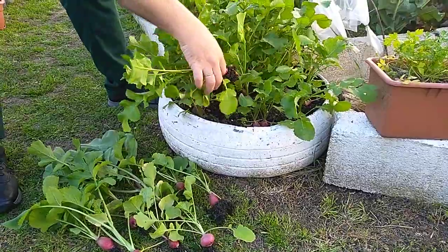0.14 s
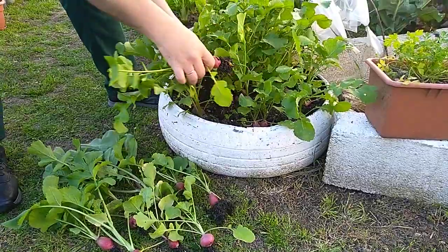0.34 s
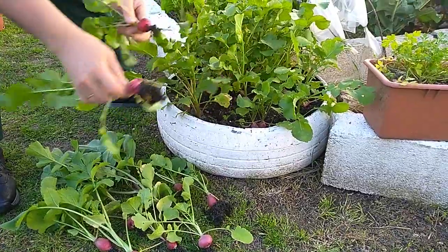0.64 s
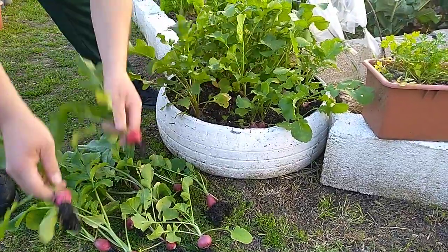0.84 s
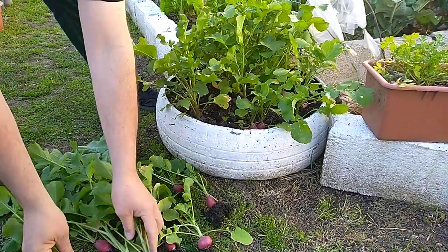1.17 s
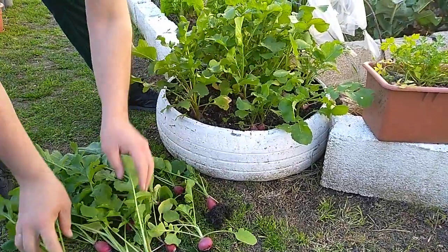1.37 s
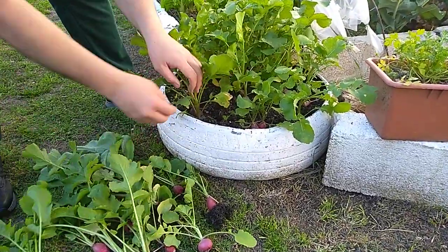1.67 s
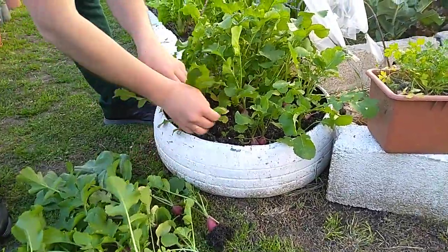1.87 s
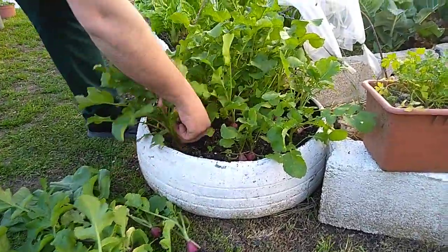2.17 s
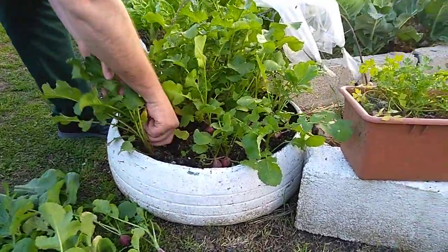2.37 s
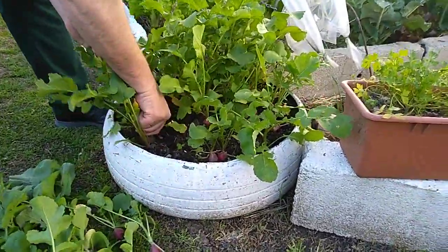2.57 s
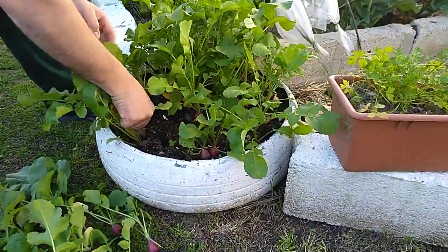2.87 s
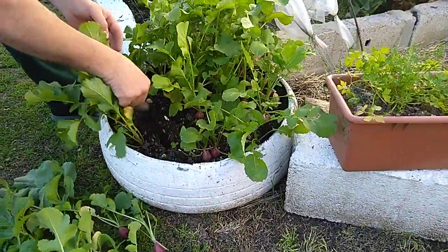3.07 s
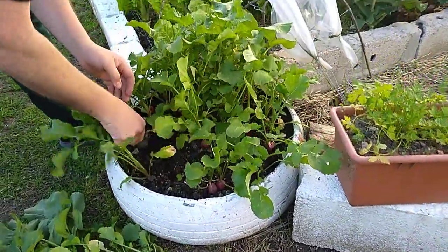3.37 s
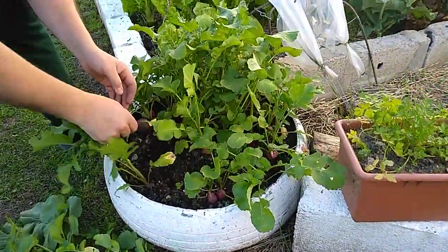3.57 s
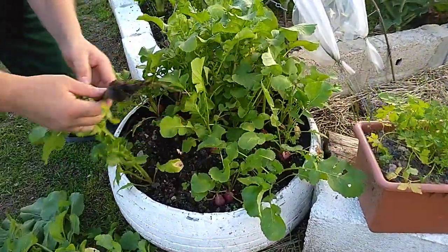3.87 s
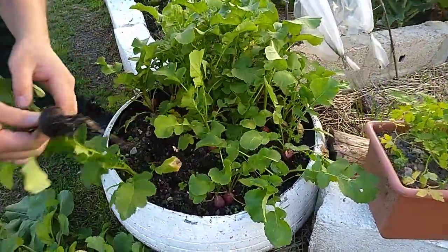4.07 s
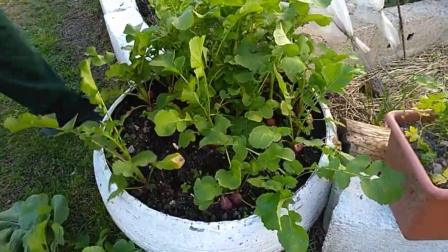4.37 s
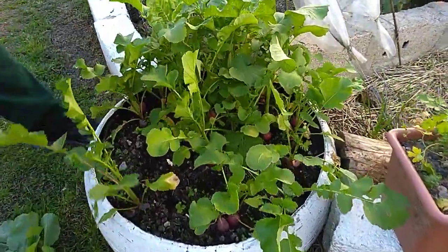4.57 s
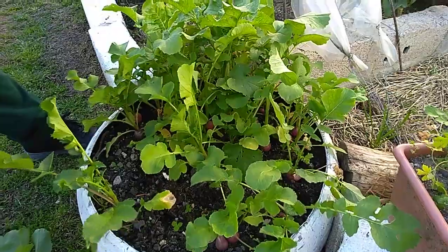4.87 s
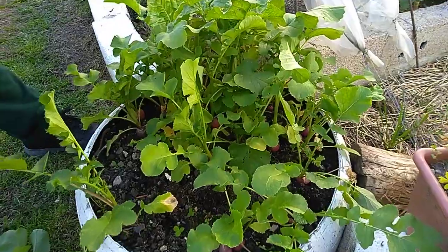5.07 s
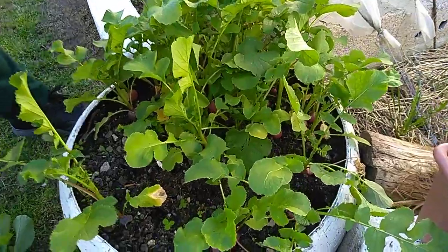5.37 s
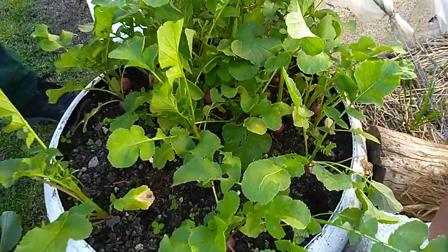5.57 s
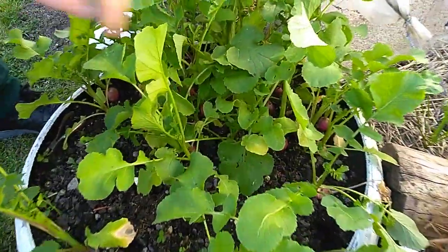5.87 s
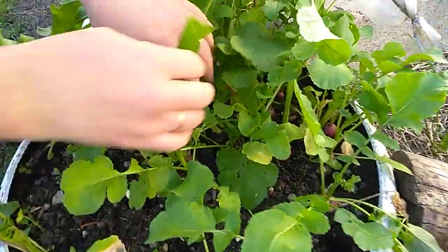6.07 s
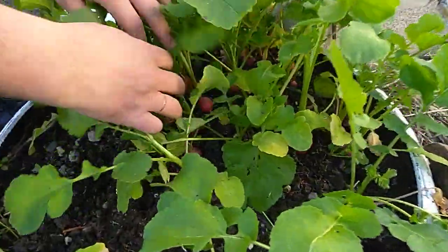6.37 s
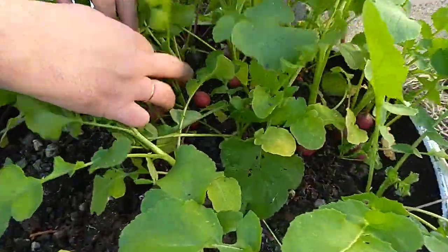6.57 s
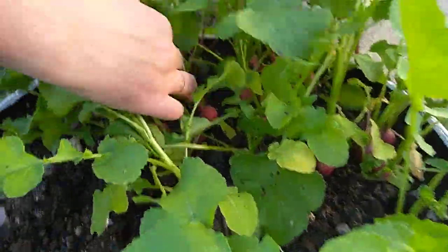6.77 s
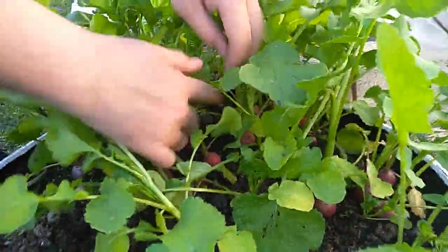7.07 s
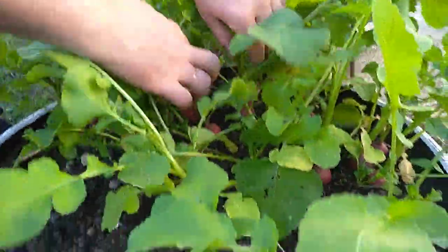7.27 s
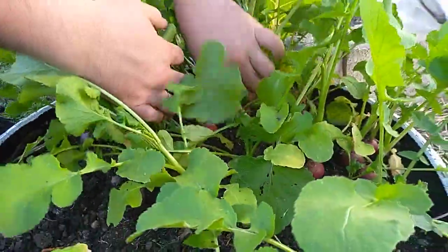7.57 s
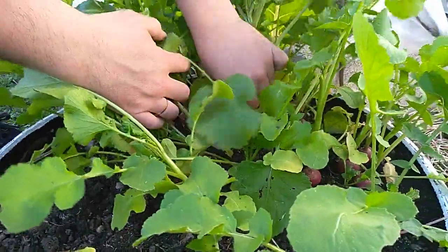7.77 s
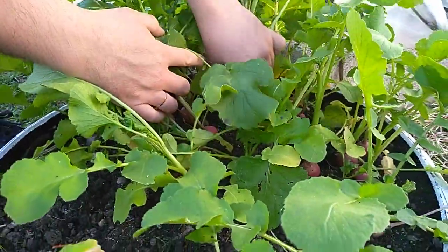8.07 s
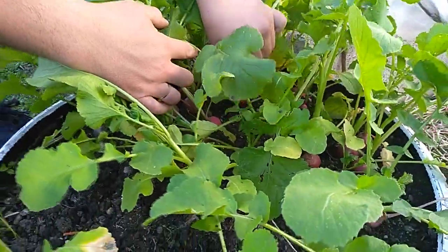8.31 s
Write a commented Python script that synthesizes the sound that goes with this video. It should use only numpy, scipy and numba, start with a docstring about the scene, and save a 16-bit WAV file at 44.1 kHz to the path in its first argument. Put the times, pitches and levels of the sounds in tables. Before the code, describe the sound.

Outdoors in a quiet garden, hands pull plants from a planter close to a hand-held stereo microphone. Soft separate leaf swishes come first, then stronger rustles around four seconds. A root tears at five and a half with a deep wind buffet, followed by continuous crackling rummaging, sharp stem snaps and low gusts, then a dull closing knock.

```python
"""Pulling radishes in a garden

Hands pull radishes from a planter and push through the leaves, close to a hand-held stereo microphone.
Leaves crackle and swish as noise gated by tiny slips; soil and bunches thud as dull, slightly hollow noise.
Stems snap as short noise cracks, knocks ring one mode each, and a tearing root is a dense run of slips.
Gusts buffet the microphone as noise in a low moving resonance, and faint far hoots are narrow gliding noise.
Behind it all lie a far rumble and hiss with a faint wavering hum."""
import sys
import numpy as np
from scipy import signal
from scipy.io import wavfile
from scipy.ndimage import uniform_filter1d
from numba import njit

SR = 44100
rng = np.random.default_rng(int(sys.argv[2]) if len(sys.argv) > 2 else 0)


def boost(x):
    """Linear amplitude factor 10**(x/20) for a level x in decibels (scalar or array-like)."""
    u = np.asarray(x, float) / 20
    return 10 ** u


def pcm_store(signal):
    """Save signal as 16-bit PCM."""
    levels = np.round(np.clip(np.atleast_2d(signal), -1, 1) * 32767)
    wavfile.write(sys.argv[1], SR, levels.astype(np.int16).T)


N = 372204


def rms_one(x):
    """Scales a sound to an average strength (rms) of 1."""
    return x / np.sqrt(np.mean(x ** 2) + 1e-20)


def mean_level_one(part):
    """Scales a stereo sound so that the mean of its two channels has strength 1."""
    return part / np.std(part.mean(axis=0))


def in_time(rows):
    """Draws straight lines between the rows of a table: one curve for each column after the time."""
    s, *columns = np.transpose(rows)
    return [np.interp(np.arange(N) / SR, s, column) for column in columns]


def at_hz(points, hz):
    """Reads a table of (frequency, value) at a frequency, on a logarithmic frequency scale."""
    points_hz, values = np.transpose(points)
    return np.interp(np.log(hz), np.log(points_hz), values)


def sides(left_over_right_db):
    """Gains of left and right that share a level difference equally."""
    return boost(np.multiply.outer([.5, -.5], left_over_right_db))


def band(x, low_hz, high_hz, order=2):
    """Keeps the frequencies between two limits."""
    limits = [low_hz, min(high_hz, SR * .45)]
    return signal.sosfilt(signal.butter(order, limits, "band", fs=SR, output="sos"), x)


def drift(rate_hz):
    """Slow random wandering with spread 1: noise at every 20th sample, smoothed twice."""
    r = np.exp(-40 * np.pi * rate_hz / SR)
    noise = rng.standard_normal(N // 20 + 4002)
    slow = signal.lfilter([1], [1, -2 * r, r * r], noise)[4000:]   # the filter has settled by then
    return np.interp(np.arange(N) / 20, np.arange(len(slow)), rms_one(slow))


def stereo_noise(alike):
    """Noise in two channels that share part of it: alike 0 is separate, 1 is the same."""
    mid, side = rng.standard_normal((2, N))
    return np.sqrt((1 + alike) / 2) * mid + np.sqrt((1 - alike) / 2) * side * [[1], [-1]]


def narrow_noise(modes):
    """Noise in narrow resonances wavers like an unsteady tone."""
    total = np.zeros(N)
    for hz, width_hz, db in modes:
        line = band(rng.standard_normal(N), hz - width_hz / 2, hz + width_hz / 2)
        total += boost(db) * rms_one(line)
    return total


@njit
def resonate(x, turn, r):
    """A resonance whose centre moves sample by sample: turn = cosine of its angle, r = pole radius."""
    y = np.zeros(x.shape)
    for c in range(len(x)):
        for i in range(2, x.shape[1]):
            y[c, i] = x[c, i] - x[c, i - 2] + 2 * r * turn[i] * y[c, i - 1] - r * r * y[c, i - 2]
    return y


def crackle(per_s, spread_db, burst_s):
    """Tiny slips: random bursts of uneven size that start at once and die fast."""
    sizes = boost(spread_db * np.minimum(rng.exponential(1, N), 5))
    chance = per_s * boost(2.5 * drift(18)) / SR   # slips come in looser and denser clumps
    slips = sizes * (rng.random(N) < chance)
    return rms_one(signal.lfilter([1], [1, -np.exp(-1 / (burst_s * SR))], slips + 1e-18))


def evened(x, share):
    """Takes part of the chance swell out of a noise, so that a gust pushes steadily while it lasts."""
    swell = np.sqrt(np.abs(uniform_filter1d(x ** 2, size=SR // 30)) + 1e-9)
    return rms_one(x / swell ** share)


def swells(s, rise_s, hold_s, fall_s, db, sag_db_per_s=0):
    """Level [dB] of each event (rows) and time since its crest; rise and fall are seconds per 20 dB."""
    since = np.arange(N // 32 + 2) * 32 / SR - np.c_[s]   # a coarse clock: every 32nd sample
    late = np.maximum(since - np.c_[hold_s], 0) / np.c_[fall_s]
    early = np.maximum(-since, 0) / np.c_[rise_s]
    sag_db = np.c_[sag_db_per_s] * np.clip(since, 0, np.c_[hold_s])
    return np.c_[db] - 20 * (early + late) - sag_db, since


def blend(levels_db, values, still_db, still_value):
    """Events add in power over a still level; a value leans towards that of the loudest event."""
    power, still = boost(2 * levels_db), boost(2 * still_db)
    total = power.sum(axis=0) + still
    value = ((power * values).sum(axis=0) + still * still_value) / total
    return [np.interp(np.arange(N) / 32, np.arange(len(total)), curve) for curve in (np.sqrt(total), value)]


# Colour of the far sound: (frequency [Hz], relative level [dB per Hz])
FAR_COLOUR = [(25, -8), (40, -3), (53, 10), (108, -4), (293, -1), (630, -11), (1370, -21), (2350, -27),
              (4140, -17), (7110, -24), (11000, -34), (16000, -46)]
# Hum of a far machine: (frequency [Hz], width [Hz], level [dB])
HUM_LINES = [(55.3, 16, -69), (123, 7.1, -72), (175, 10.7, -77)]
# How alike left and right are: (frequency [Hz], likeness [0 to 1])
FAR_LIKENESS = [(130, 0.93), (290, 0.85), (640, .35), (1400, 0)]


def garden():
    """Far rumble and hiss, built from half-octave bands, with the wavering lines of a far machine."""
    far_db = -73.5
    out = 0
    edges = 25 * 2 ** np.arange(0, 9.6, .5)
    white = rng.standard_normal((2, 2, N))   # neighbouring bands take turns between two noises
    for k, (low, high) in enumerate(zip(edges, edges[1:])):
        mid, side = band(white[k % 2], low, high)
        hz = np.sqrt(low * high)
        alike = at_hz(FAR_LIKENESS, hz)
        both = np.sqrt(1 + alike) * mid + np.sqrt(1 - alike) * side * [[1], [-1]]
        out = out + boost(at_hz(FAR_COLOUR, hz)) * both
    return boost(far_db) * rms_one(out) * boost(1.7 * drift(3)) + narrow_noise(HUM_LINES)


# Single strokes through the leaves: (crest time [s], rise [s per 20 dB], hold [s], fall [s per 20 dB],
# swish level [dB], heavy low swish relative to the swish [dB])
LEAF_STROKES = [(0.0, .1, .05, .5, -72, -6), (0.455, .04, .08, .14, -53, -12), (0.65, .1, .03, .1, -62, -6),
                (1.04, .085, .31, .065, -63, -9), (1.16, .2, .01, .18, -57, -11),
                (1.582, .015, .05, .3, -64, -21), (1.69, .09, .09, .25, -51.5, -10),
                (1.93, .25, .04, .2, -55, -20), (2.14, .16, .03, .16, -52.5, -14),
                (2.36, .1, .06, .3, -60, -16), (2.45, .1, .05, .14, -47.5, -20),
                (2.72, .1, .08, .1, -59.5, -15), (3.085, .11, .07, .1, -46, -18),
                (3.25, .1, .03, .24, -62, -17), (3.673, .1, .02, .17, -54, -17),
                (3.862, .03, .005, .1, -51, -22), (3.917, .012, .04, .1, -43.5, -20),
                (3.975, .03, .02, .16, -42.5, -19), (4.09, .25, .02, .2, -43.5, -16),
                (4.185, .045, .008, .08, -36, -22), (4.215, .08, .045, .125, -39, -16),
                (4.571, .07, .01, .15, -57, -18), (4.85, .065, .06, .13, -46.5, -14),
                (5.184, .065, .005, .025, -52, -17), (5.29, .08, .01, .04, -61, -11),
                (5.445, .012, .04, .2, -55, -14), (5.515, .04, .025, .14, -41, -18),
                (5.6, .12, .035, .12, -39, -15), (5.74, .1, .03, .1, -66, -4),
                (8.367, .09, .02, .2, -59, -17), (8.437, .045, .01, .1, -41, -16)]
# Both hands rummaging: (time [s], swish level [dB], heavy low swish relative to the swish [dB])
RUMMAGING = [(5.93, -85, -3), (5.942, -62, -19), (5.975, -60, -17), (6.0, -43, -21), (6.05, -50, -14),
             (6.16, -46, -20), (6.195, -38, -21), (6.3, -45, -17), (6.446, -39, -19), (6.54, -36, -18),
             (6.585, -38, -18), (6.68, -45, -20), (6.70, -40, -22), (6.786, -46, -26), (6.84, -40, -24),
             (6.95, -38, -20), (7.03, -44, -20), (7.07, -40, -17), (7.279, -36.5, -19), (7.38, -47, -21),
             (7.5, -42, -26), (7.64, -47, -19), (7.75, -51, -21), (7.87, -62, -15), (8.12, -72, -8),
             (8.25, -63, -14)]


def hands():
    """Gain of the swish and level of its low part: the strokes, joined by the rummaging once it begins."""
    still_db, still_low_db = -89, 3   # leaves stirring between strokes
    s, rise_s, hold_s, fall_s, db, low_db = np.transpose(LEAF_STROKES)
    levels_db, _ = swells(s, rise_s, hold_s, fall_s, db)
    gain, low_db = blend(levels_db, np.c_[low_db], still_db, still_low_db)
    rummage_db, rummage_low_db = in_time(RUMMAGING)
    begun = np.arange(N) / SR > RUMMAGING[0][0]
    rummage = boost(rummage_db) * begun
    total = np.hypot(gain, rummage)
    return total, (low_db * gain ** 2 + rummage_low_db * rummage ** 2) / total ** 2


# Colour of the swish: (frequency [Hz], relative level [dB per Hz])
SWISH_COLOUR = [(900, -29), (1250, -22), (1900, -13), (2600, -11.5), (3300, -18), (4900, -13), (6300, -5),
                (9500, -1), (12500, -5), (15500, -8)]
# Lean of the swish: (frequency [Hz], left over right [dB])
SWISH_LEAN = [(1000, 0), (2500, -2.5), (6000, -4), (10000, 0), (15000, 4.5)]
# Where the hands work: (time [s], finest top relative to the swish [dB], left over right [dB])
HAND_PLACES = [(0.0, 0, 3), (0.45, 3, 4), (0.79, -15, 3), (1.0, -3, -1), (1.8, -2, 0), (2.2, -8, 1),
               (2.7, -2, 0), (3.54, -10, -6), (3.72, -13, -6), (3.81, -4, 0), (5.15, -9, -7),
               (5.8, -10, -4), (6.1, -5, 1), (7.1, -7, 0), (7.81, 0, 8), (7.95, -9, 2), (8.44, -6, -1)]


def leaves():
    """Slips of leaf on leaf gate noise in third-octave bands; a steady rub fills the gaps between them."""
    middle_follows, usual_low_db = .45, -20   # share of the low swish's change [dB per dB], its usual level
    swish, low_db = hands()
    top_db, pan_db = in_time(HAND_PLACES)
    slips = 0.75 + .42 * crackle(900, 3.3, .0008)
    white = rms_one(slips) * rng.standard_normal((2, 2, N))
    # the left port hears part of the right one 6 samples late
    white[:, 0] += .27 * np.roll(white[:, 1], 6, axis=-1)

    edges = 900 * 2 ** np.arange(0, 4.3, 1 / 3)
    parts = np.zeros((4, 2, N))   # low, middle, high, top
    for k, (low, high) in enumerate(zip(edges, edges[1:])):
        hz = np.sqrt(low * high)
        colour = boost(at_hz(SWISH_COLOUR, hz) + 1.5 * drift(14))   # each band's level wanders at random
        gain = colour * sides([at_hz(SWISH_LEAN, hz)])
        which = int(hz > 2800) + int(hz > 5500) + int(hz > 11000)
        parts[which] += gain * band(white[k % 2], low, high)

    # single leaves scrape in one range only
    low, middle, high, top = [part * rms_one(1 + .2 * crackle(70, 2.5, .006)) for part in parts]
    # a stroke with more low swish also fills the lower treble
    fill = boost(middle_follows * (low_db - usual_low_db))
    middle = (fill * middle + high) / np.std((middle + high).mean(axis=0))
    low, top = mean_level_one(low), mean_level_one(top)
    return swish * sides(pan_db) * (boost(low_db) * low + middle + boost(top_db) * top)


# Soil crumbling, steps and bunches put down: (crest time [s], rise [s per 20 dB], hold [s],
# dull noise level [dB], hollow pitch [Hz])
EARTH_EVENTS = [(0.05, .08, .01, -63, 300), (1.665, .03, .1, -58, 700), (2.31, .05, .14, -64, 420),
                (2.93, .05, .12, -68, 800), (3.48, .1, .17, -69, 500), (4.2, .3, .17, -67, 650),
                (5.52, .08, .05, -57, 330), (6.17, .2, .1, -65, 500), (6.54, .15, .03, -62, 350),
                (7.44, .3, .14, -61, 300), (8.412, .01, .01, -50, 330)]


def soil():
    """Crumbling earth and soft footfalls: dull noise in loose clumps, ringing a little hollow."""
    fall_s, still_db, still_hz = .25, -77, 450   # fall per 20 dB; level and pitch between the events
    hollow_width_hz, hollow_share = 250, .8
    s, rise_s, hold_s, db, hz = np.transpose(EARTH_EVENTS)
    levels_db, _ = swells(s, rise_s, hold_s, fall_s, db)
    gain, hz = blend(levels_db, np.c_[hz], still_db, still_hz)
    crumbs = stereo_noise(.05) * (0.59 + 0.48 * crackle(120, 4.4, 0.005))
    hollow = resonate(crumbs, np.cos(2 * np.pi * hz / SR), np.exp(-np.pi * hollow_width_hz / SR))
    dull = rms_one(band(crumbs, 200, 1100))
    return gain * rms_one(dull + hollow_share * rms_one(hollow))


# Gusts on the microphone: (onset time [s], hold [s], buffet level [dB], first pitch [Hz],
# weakening during the hold [dB per s], negative = growing)
WIND_GUSTS = [(0.05, .07, -50, 170, 80), (0.155, .08, -50, 60, 5), (0.365, .07, -55, 85, 60),
              (1.4, .14, -55, 52, 10), (5.52, .19, -27, 112, 50), (6.49, .085, -38, 100, 30),
              (6.59, .09, -50, 80, -90), (7.278, .045, -35, 105, 100), (7.36, .07, -41, 95, -50),
              (7.46, .14, -38, 76, 110), (7.63, .1, -37, 125, 20), (7.755, .21, -39, 76, 12),
              (8.135, .18, -50, 84, 35), (8.41, .04, -43, 120, 20)]


def gusts():
    """Gain and pitch of the buffeting: each gust sets in sharply, may weaken or sink, then breaks off."""
    rise_s, fall_s = .009, .03   # per 20 dB
    settles_hz, settle_s = 70, .2   # a higher pitch sinks towards this one
    breeze_db, breeze_hz = -71, 80   # between gusts
    s, hold_s, db, hz, sag = np.transpose(WIND_GUSTS)
    levels_db, since = swells(s, rise_s, hold_s, fall_s, db, sag)
    first, last = np.c_[hz], np.minimum(np.c_[hz], settles_hz)
    pitch = last + (first - last) * np.exp(-np.maximum(since, 0) / settle_s)
    return blend(levels_db, pitch, breeze_db, breeze_hz)


def air():
    """Eddies shed at the ports: lumpy noise in a moving low resonance, beside a broad roar."""
    gain, hz = gusts()
    eddies = stereo_noise(.96) * boost(2.0 * drift(26.6))
    turn = np.cos(2 * np.pi * hz / SR)
    tone = resonate(eddies, turn, np.exp(-np.pi * 16. / SR))   # 16 Hz wide, then 60 Hz
    tone = resonate(tone, turn, np.exp(-np.pi * 60. / SR))
    roar = rms_one(band(band(eddies, 55, 180), 55, 280))
    roar_share = .36 * (hz / 100) ** 3   # grows with the pitch cubed
    buffet = rms_one(tone) + roar_share * roar
    return gain * evened(buffet, .8) * sides([1.2])


# Stems and leaf ribs snapping: (time [s], peak level before a 2.5 dB lift and panning [dB],
# guide pitch [Hz], left over right [dB])
STEM_SNAPS = [(0.4488, -35, 12800, 7.0), (0.572, -39, 2800, 2), (1.034, -43, 12300, 3),
              (1.5784, -45, 9450, 5), (1.827, -39, 10000, 0), (2.676, -46, 12500, 0),
              (2.7142, -31, 10500, 3.0), (2.7254, -38, 9050, 0.5), (3.7145, -36.5, 7520, -2),
              (3.8583, -32, 12800, 3), (3.9145, -33, 8200, -9), (5.1776, -32, 8090, -10.5),
              (5.439, -35, 7100, 3), (5.9405, -43, 8500, -12.0), (5.9928, -34, 8430, 9.5),
              (6.189, -26, 11500, 4), (6.203, -28, 11500, 2), (6.449, -26, 10500, 0),
              (6.538, -22, 12500, 2), (7.2794, -19, 9080, 1.5), (7.6929, -14, 15500, 6)]


def snaps():
    """Each snap is a millisecond crack near its guide pitch, and the leaf shivers after it."""
    out, t = np.zeros((2, N)), np.arange(2000) / SR
    for s, peak_db, hz, pan_db in STEM_SNAPS:
        fade = np.exp(-t / 0.00086) + 0.13 * np.exp(-t / 0.014)   # crack, then shiver
        noise = rng.standard_normal((2, len(t))) * fade
        pitched = band(noise, hz / 1.18, hz * 0.95, order=1)
        burst = pitched + 0.083 * band(noise, 1800, 17000, order=1)
        i = round(s * SR)
        out[:, i:i + len(t)] += boost(peak_db + 2.5) * sides([pan_db]) * burst / np.abs(burst).max()
    return out


# Faint far hoots: (onset time [s], hold [s], level before panning [dB], first pitch [Hz], last pitch [Hz])
FAR_HOOTS = [(0.545, .085, -60, 458, 465), (0.66, .12, -70, 462, 455), (3.475, .18, -73, 490, 500)]


def far_hoots():
    """Noise in a narrow gliding resonance: a rough wavering tone, off to the right."""
    rise_s, fall_s, width_hz = .03, .05, 18   # rise and fall per 20 dB
    out = np.zeros(N)
    for s, hold_s, db, first_hz, last_hz in FAR_HOOTS:
        start = round((s - .1) * SR)   # leaves room for the rise
        t = np.arange(round((hold_s + .3) * SR)) / SR - .1
        turn = np.cos(2 * np.pi * np.interp(t, [0, hold_s], [first_hz, last_hz]) / SR)
        noise = rng.standard_normal((1, len(t)))
        tone = resonate(noise, turn, np.exp(-np.pi * width_hz / SR))[0]
        shape_db = db - 20 * (np.maximum(-t, 0) / rise_s + np.maximum(t - hold_s, 0) / fall_s)
        out[start:start + len(t)] += boost(shape_db) * rms_one(tone)
    return out * sides([-3.0])


# Hollow knocks of a root or finger on the rim: (time [s], level of the ring before panning [dB],
# pitch [Hz], time to fall by 60 dB [s])
RIM_KNOCKS = [(3.054, -48, 1030, .03), (7.622, -43, 1700, .055), (7.638, -46, 929, .045),
              (7.691, -47, 2020, .04), (8.407, -28, 675, .022)]


def knocks():
    """A hard contact cracks and rings one hollow mode."""
    out, t = np.zeros(N + SR // 10), np.arange(SR // 10) / SR
    for s, peak_db, hz, t60 in RIM_KNOCKS:
        noise = rms_one(band(rng.standard_normal(len(t)), 250, 2200))
        crack = .8 * noise * np.exp(-t / .0015)
        ring = boost(-60 * t / t60) * np.sin(2 * np.pi * hz * t)
        i = round(s * SR)
        out[i:i + len(t)] += boost(peak_db) * (ring + crack)
    return out[:N] * sides([-2.5])


def tearing():
    """A root tears loose: fine roots give way in a dense run of slips, in one firm band."""
    low_hz, high_hz = 1350, 2350
    levels_db, _ = swells([5.522], rise_s=.035, hold_s=.13, fall_s=.14, db=-44.5, sag_db_per_s=30)
    gain, _ = blend(levels_db, 0, -120, 0)
    fibres = stereo_noise(.2) * (1.2 + .5 * crackle(300, 3.0, .002))
    firm = band(band(fibres, low_hz, high_hz), low_hz * .8, high_hz * 1.2)
    return gain * rms_one(firm) * sides([-3.5])


def scene():
    """All the sounds together."""
    return garden() + leaves() + soil() + air() + snaps() + far_hoots() + knocks() + tearing()


def low_pass(x):
    """Removes everything above the highest recorded frequency."""
    return signal.sosfilt(signal.butter(12, 16990, fs=SR, output="sos"), x)


def record(dry):
    """The top is cut steeply: 40 dB down from 15950 Hz on."""
    steep = signal.cheby2(22, 40, 15950, fs=SR, output="sos")
    mix = signal.sosfilt(steep, dry)
    return low_pass(mix)


dry = scene()
out = record(dry)
pcm_store(out)
```